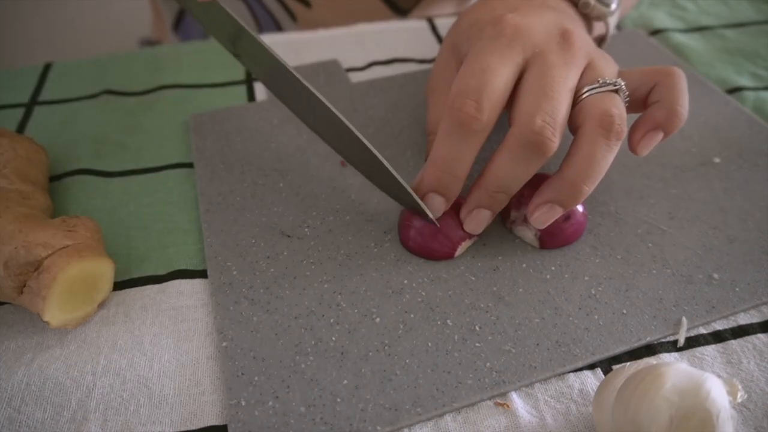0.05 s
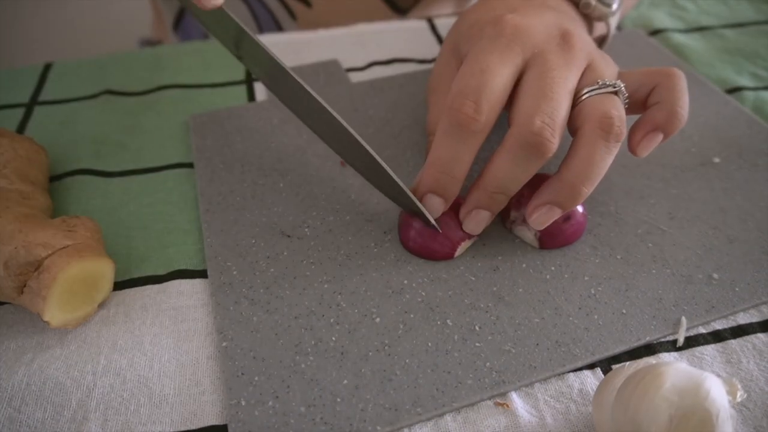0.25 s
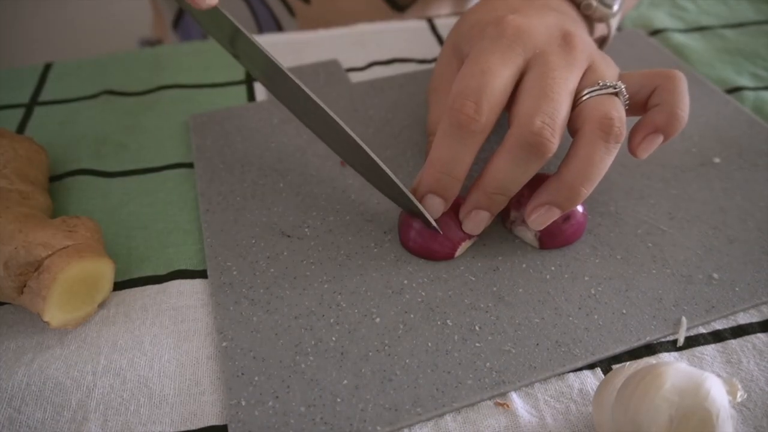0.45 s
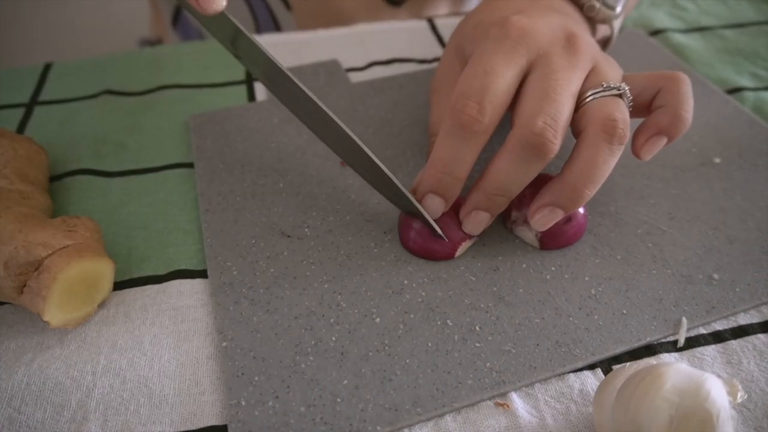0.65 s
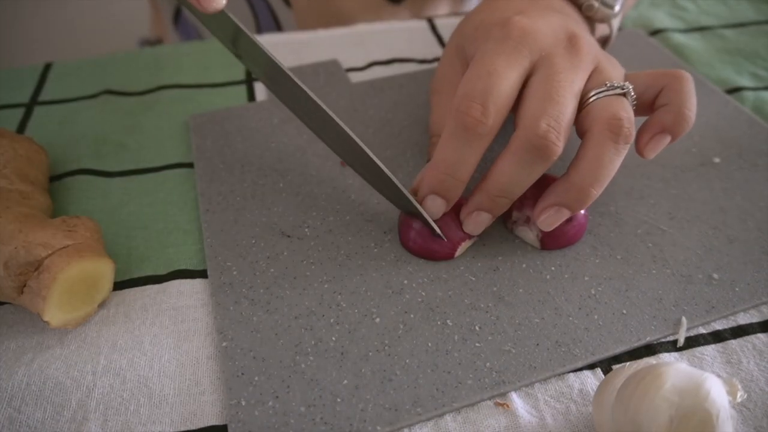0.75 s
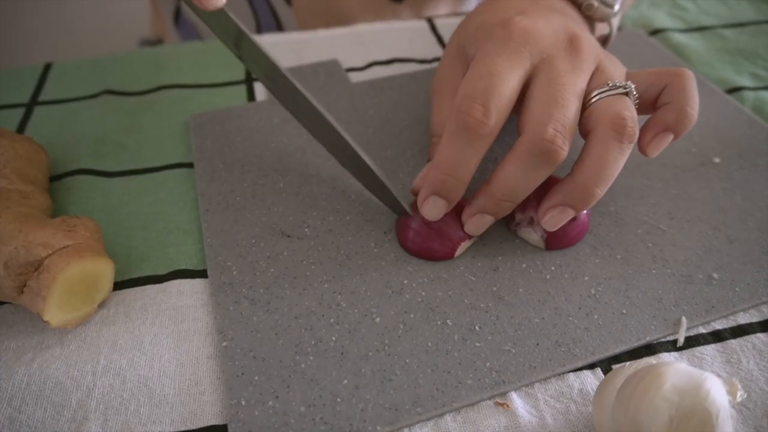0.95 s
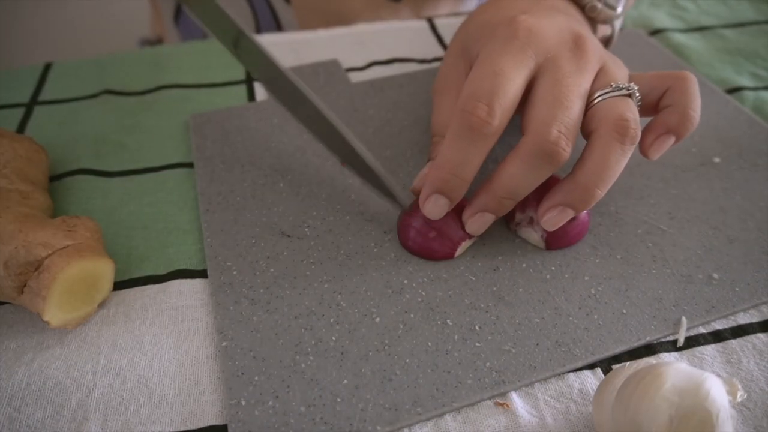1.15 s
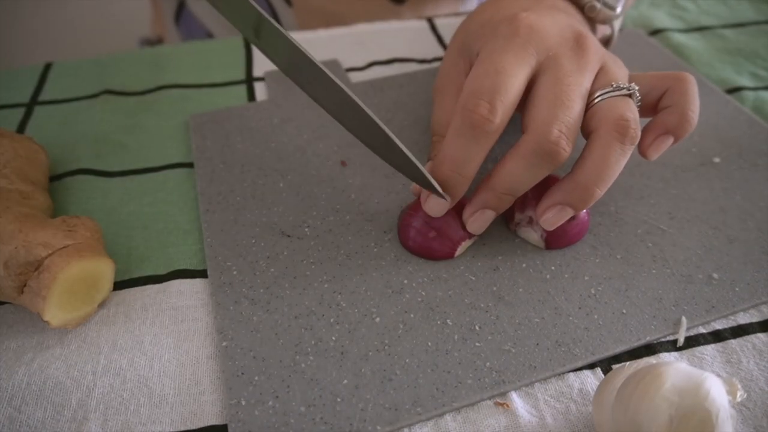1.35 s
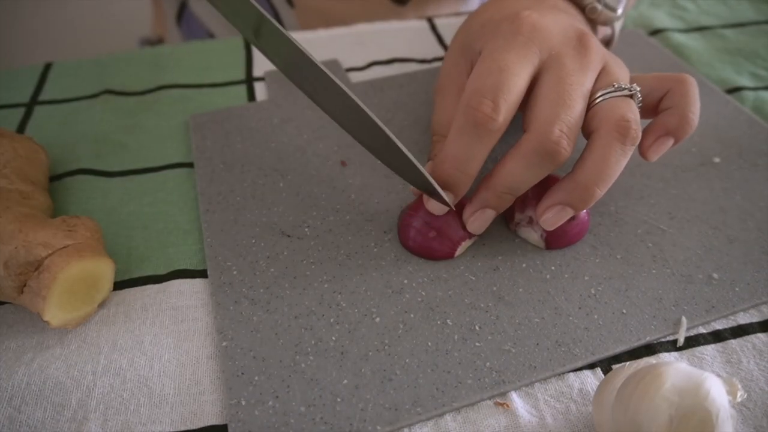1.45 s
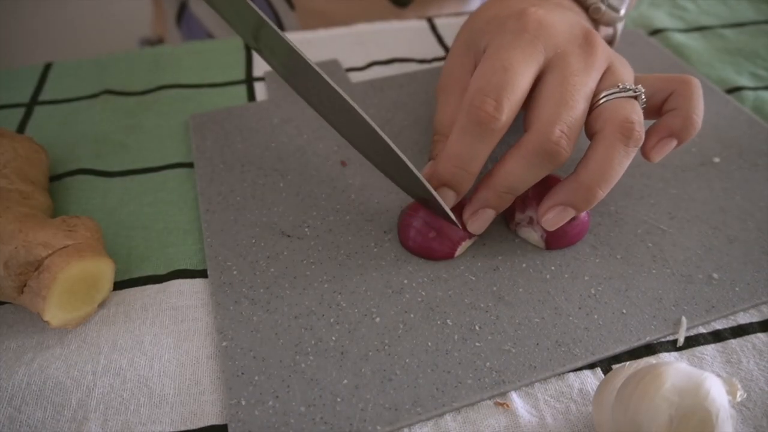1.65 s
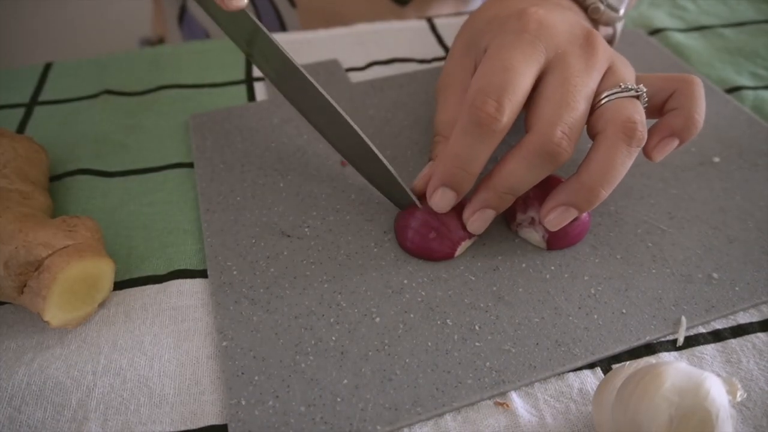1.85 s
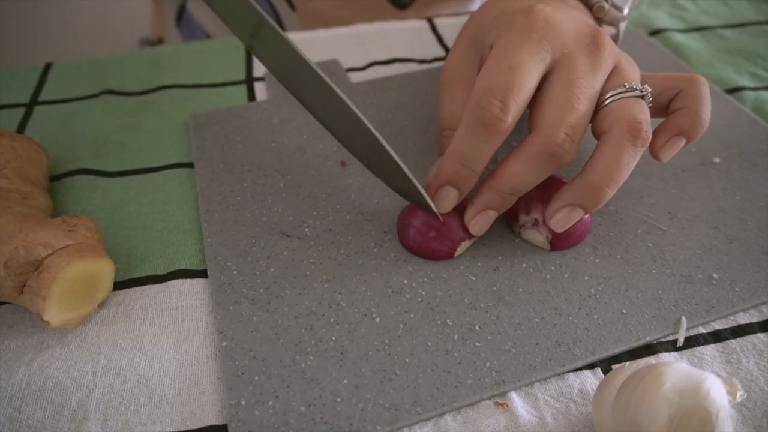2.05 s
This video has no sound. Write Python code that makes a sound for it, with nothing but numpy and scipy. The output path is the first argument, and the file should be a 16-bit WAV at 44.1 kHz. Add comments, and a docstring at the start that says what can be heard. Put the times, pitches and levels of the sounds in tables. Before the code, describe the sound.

Close cutting of a shallot in a quiet kitchen: the knife crackles softly through the layers and knocks sharply on a plastic board. It pauses, then crunches through again and strikes the board once more.

```python
"""Cutting a shallot

A knife tip pierces a shallot on a plastic board in a quiet kitchen. Tearing cells crackle, single layers
snap and soft landings thud. Two hard chops excite the modes of the board, the worktop and a metal bowl
nearby. The room reverberates, and the microphone overloads on the chops."""
import sys
import numpy as np
from scipy import signal
from scipy.io import wavfile

SR = 44100
rng = np.random.default_rng(int(sys.argv[2]) if len(sys.argv) > 2 else 0)


def put_to_file(sound):
    """Save the sound as 16-bit audio at rate SR, in the file named by the first command-line argument."""
    columns = np.atleast_2d(sound).T  # one column per channel
    safe = np.clip(columns, -1, 1)
    whole_steps = np.round(safe * 32767)
    wavfile.write(sys.argv[1], SR, whole_steps.astype(np.int16))


N = 92698


def amp(db):
    return 10 ** (np.asarray(db) / 20)


def unit_rms(x):
    return x / np.sqrt(np.mean(x ** 2) + 1e-20)


def at_hz(curve, hz):
    freqs, values = np.transpose(curve)
    return np.interp(np.log(hz), np.log(freqs), values)


def band(x, low_hz, high_hz):
    return signal.sosfilt(signal.butter(2, [low_hz, high_hz], "band", fs=SR, output="sos"), x)


def filter_bank(x, spectrum):
    """Spectral shaping: parallel third-octave bands, each at its own level."""
    low_hz, high_hz = spectrum[0][0], spectrum[-1][0]
    edges = low_hz * 2 ** np.arange(0, np.log2(high_hz / low_hz) + .1, 1 / 3)
    return sum(amp(at_hz(spectrum, np.sqrt(a * b))) * (-1) ** k * band(x, a, b)
               for k, (a, b) in enumerate(zip(edges, edges[1:])))


def drift(rate_hz):
    """Random modulation: low-passed noise of unit RMS."""
    r = np.exp(-2 * np.pi * rate_hz / SR)
    return unit_rms(signal.lfilter([1], [1, -2 * r, r * r], rng.standard_normal(N + SR))[SR:])


def mode(x, hz, t60_s):
    """Damped resonance: each impulse starts a decaying sine."""
    r, w = amp(-60 / (t60_s * SR)), 2 * np.pi * hz / SR
    return signal.lfilter([0, np.sin(w)], [1, -2 * r * np.cos(w), r * r], x + 1e-18)


def impulses(times_s, levels_db):
    out = np.zeros(N)
    np.add.at(out, (np.asarray(times_s) * SR).astype(int), amp(levels_db))
    return out


def noise_burst(x, t60_s):
    """Exponential decay: each impulse starts a dying burst of white noise."""
    envelope = signal.lfilter([1], [1, -amp(-60 / (t60_s * SR))], x + 1e-18)
    return envelope * rng.standard_normal(N)


def relax(x, tau_s):
    """Relaxation: each impulse becomes a decaying pulse of the same height."""
    return signal.lfilter([1], [1, -np.exp(-1 / (tau_s * SR))], x + 1e-18)


def contact_force(start_s, level_db, contact_ms):
    """Elastic impact: a half-sine force, duller the longer the contact lasts."""
    pulse = np.sin(np.linspace(0, np.pi, int(contact_ms * SR / 1000) + 2))
    return np.convolve(impulses([start_s], level_db), pulse / pulse.sum())[:N]


# Background spectrum: frequency_hz, relative_density_db
AIR_SPECTRUM = [(12, -42), (20, 1), (127, -5), (248, -6.5), (434, -8.5), (513, -10), (1030, -16),
                (3160, -30), (3840, -33.5), (4670, -34), (5380, -39), (14700, -50), (16000, -55)]


def kitchen_air():
    """Noise floor: bass-heavy air and microphone hiss, wavering slowly in level."""
    noise = filter_bank(rng.standard_normal(N + SR // 2), AIR_SPECTRUM)[SR // 2:]
    return amp(-42.5 + 1.36 * drift(rate_hz=2.1)) * unit_rms(noise)


# Reverberation time: frequency_hz, t60_s
ROOM_DECAY = [(100, 0.54), (260, 0.43), (700, 0.39), (1840, 0.49), (4200, 0.52), (6500, 0.42),
              (12000, 0.33)]
# Reverberation spectrum: frequency_hz, relative_level_db
ROOM_SPECTRUM = [(60, -9.5), (200, -1), (500, -4), (1000, -3), (2000, -6.5), (3000, -12), (4200, -12),
                 (6000, -17), (9000, -10.5), (15000, -17)]


def room(x, gain_db=-32.5, rise_s=0.0094):
    """Diffuse reverberation: a noise response builds up, then decays band by band."""
    t = np.arange(SR // 2) / SR
    edges = 50 * 2 ** np.arange(0, 8.6, .5)
    white = rng.standard_normal((2, len(t)))
    tail = 0
    for k, (a, b) in enumerate(zip(edges, edges[1:])):
        hz = np.sqrt(a * b)
        tail += band(white[k % 2], a, b) * amp(at_hz(ROOM_SPECTRUM, hz) - 60 * t / at_hz(ROOM_DECAY, hz))
    build_up = 1 - np.exp(-(t / rise_s) ** 2)
    return amp(gain_db) * signal.fftconvolve(x, tail * build_up)[:N]


# Soft landings of blade or shallot: start_s, level_db, contact_ms
LANDINGS = [(0.0492, -11, 3.4), (0.0702, -19, 4.8), (0.26, -28, 0.89), (.51, -22.5, 1.25),
            (0.802, -29.5, 2.3), (0.886, -29, 1.3), (1.582, -13.5, 2.7), (1.593, -19, 2.5),
            (1.718, -9.5, 1.7), (1.739, -14, 1.2), (1.991, -40, 2.6)]
# Low modes of board and worktop: pitch_hz, gain_db, t60_s
LOW_MODES = [(105, -12, .08), (170, 0.5, .025), (235, -8, .04)]


def thuds():
    """Low-pass excitation: soft contacts stir only the lowest modes of board and worktop."""
    force = band(sum(contact_force(*row) for row in LANDINGS), 76, 3000)
    return sum(amp(db) * mode(force, hz, t60) for hz, db, t60 in LOW_MODES)


# Cutting envelopes, one per stroke: time_s, crackle_db, crunch_relative_db
CUTTING_STROKES = [
    [(0.05, -48, 6), (0.066, -58.5, 1), (0.096, -49.5, 2.5), (0.154, -67, 4), (0.174, -57.5, 1),
     (0.244, -50, 5), (0.26, -40.5, 7.5), (0.282, -72, 3), (0.328, -63, 4), (0.336, -81, 15),
     (0.344, -64, 11), (0.36, -76, 11)],
    [(.44, -70, 4), (.4894, -58, 10), (.4925, -40, 15.5), (.5035, -47.5, 9.5), (.5085, -42.5, 13.5),
     (.5305, -48.5, 9.5), (.5555, -45.5, 4), (.5785, -54, -2), (.6, -67, -2), (.63, -60, 8), (.668, -69, 3),
     (.7, -62, -3)],
    [(.7, -82, -2), (.74, -56, 15), (.76, -64, 9), (.8, -50.5, 8), (.83, -63.5, 8), (.87, -63.5, 7),
     (.882, -50, 12), (.91, -66, -3), (.946, -56.5, 8.5), (.957, -44.5, 8), (.967, -37, 8),
     (.9785, -22.5, 9), (.9805, -41, -5)],
    [(1.583, -45.5, 8), (1.6, -70.5, -9), (1.63, -79, -3), (1.636, -56.5, 7.5), (1.66, -69, -5),
     (1.675, -49, 9.5), (1.688, -59, 4), (1.695, -37.5, 5), (1.706, -46, 15), (1.711, -31.5, 10.5),
     (1.719, -31, 4), (1.723, -51, -15), (1.735, -66, -1)],
    [(1.7664, -29, 15), (1.7725, -51, 3), (1.7785, -43, 5), (1.7825, -30.5, 9), (1.7965, -27, 5),
     (1.8105, -25.5, 4.5), (1.8195, -29.5, 14.5), (1.8225, -55, -3)],
    [(1.88, -61, 13), (1.91, -59, 9), (1.95, -46, -19), (1.96, -70, 3), (1.992, -58.5, -16),
     (2.01, -72, -15), (2.05, -81, 3)],
]
# Spectra of fine crackle and coarse crunch: frequency_hz, relative_density_db
CRACKLE_SPECTRUM = [(3000, -30), (3900, -8), (4800, 5.5), (6000, -0.5), (7400, -16.5), (9200, 7),
                    (11000, -10), (13200, -5.5), (15600, -6)]
CRUNCH_SPECTRUM = [(250, -2), (600, 3), (900, -0.5), (1300, -3.5), (2000, -1.5), (2600, -1.5), (3300, -9),
                   (4200, -27)]


def tearing_cells(tears_per_s=7000, spread_db=4.0, clump_db=2.6):
    """Acoustic emission: cells tear in dense, clumped clicks, heard as crackle and crunch."""
    t, fine, coarse = np.arange(N) / SR, np.zeros(N), np.zeros(N)
    for stroke in CUTTING_STROKES:
        time_s, crackle_db, relative_db = np.transpose(stroke)
        fine += amp(np.interp(t, time_s, crackle_db, -200, -200))
        coarse += amp(np.interp(t, time_s, crackle_db + relative_db, -200, -200))
    sizes = amp(spread_db * np.minimum(rng.exponential(1, N), 4)) * rng.choice([-1, 1], N)
    tears = sizes * (rng.random(N) < tears_per_s / SR) * amp(clump_db * drift(rate_hz=146))
    crackle = fine * unit_rms(filter_bank(tears, CRACKLE_SPECTRUM))
    crunch = coarse * unit_rms(filter_bank(tears, CRUNCH_SPECTRUM))
    # Dry skin rustles on top, partly following the crackle's level.
    skin = amp(-23) * fine ** .6 * unit_rms(band(tears[::-1], 9000, 16600))
    return skin + crackle + crunch


# Single layers breaking: start_s, level_db, pop_relative_db
LAYER_SNAPS = [(.0505, -29, -7), (0.2538, -39, -8), (0.2624, -27, 3.5), (0.4913, -21.5, 4),
               (.492, -20, 5.5), (.5048, -26.5, -2), (.5066, -17.5, -4.5), (.5735, -20, -9),
               (.589, -32, -15), (.6188, -33, -8), (.711, -38, -25), (0.726, -38, -9), (0.7372, -24, -8),
               (.779, -23, -15), (.852, -37, -6), (.876, -33.5, 4), (0.9138, -30.5, -5), (0.9377, -35, 2),
               (0.9738, -14, 3), (1.11, -27, -23), (1.131, -27, -25), (1.175, -32, -23), (1.21, -45, -42),
               (1.585, -31, 3.5), (1.6333, -34, -6), (1.6753, -26, -2), (1.6945, -31, -7),
               (1.766, -15.5, 2), (1.782, -22, -6), (1.7962, 0, -9), (1.808, -7, 2)]


def snapping_layers():
    """Sudden fracture: each layer gives a bright tick, a duller inward pop and a short fizz."""
    start_s, level_db, pop_db = np.transpose(LAYER_SNAPS)
    breaks = impulses(start_s, level_db)
    tick = relax(breaks, tau_s=3e-5)
    pop = relax(impulses(start_s, level_db + pop_db - 1.5), tau_s=1e-4)
    pop = relax(pop, tau_s=1e-4)  # rounds the attack
    fizz = amp(-13) * band(noise_burst(breaks, t60_s=0.004), 1200, 14000)
    return fizz - band(tick + pop, 620, 22000)


# Touches of the knife tip: start_s, level_db, buzz_relative_db
TIP_TOUCHES = [(.0515, -38.5, -9), (1.583, -38, -31.5)]
# Blade modes: pitch_hz, gain_db, t60_s
BLADE_MODES = [(9400, -9, .05), (13200, -22, .02), (14900, -20, .02)]


def singing_blade():
    """Modal ringing: a touch makes the blade sing, and sparse fading clicks keep it buzzing."""
    start_s, level_db, buzz_db = np.transpose(TIP_TOUCHES)
    taps = impulses(start_s, level_db)
    buzz = amp(1.5) * noise_burst(impulses(start_s, level_db + buzz_db), t60_s=0.46)
    buzz *= rng.random(N) < .01
    return sum(amp(db) * mode(taps + buzz, hz, t60) for hz, db, t60 in BLADE_MODES)


# Hard chops: start_s, level_db, contact_ms, bowl_db, room_treble_db
HARD_CHOPS = [(0.9792, 8, 0.51, -30.5, 20), (1.8199, 5.5, 0.69, -36.5, 3)]
# Plastic board modes: pitch_hz, gain_db, t60_s
BOARD_MODES = [(187, -25.5, 0.2), (229, -19, 0.16), (310, -40, 0.46), (412, -15.5, 0.19), (505, -24, 0.23),
               (512, -21.5, 0.18), (676, -29, 0.098), (738, -25.5, 0.29), (797, -21, 0.25),
               (802, -27, 0.34), (918, -26, 0.23), (1007, -36, 0.37), (1230, -38, 0.49),
               (1427, -29.5, 0.25)]


def chops(board_rise_s=0.01):
    """Impact radiation: an N-shaped pulse and a crack, then the modes of worktop and board."""
    impact, ringing = np.zeros(N), np.zeros(N)
    for start_s, level_db, contact_ms, _, _ in HARD_CHOPS:
        force = contact_force(start_s, level_db, contact_ms)
        pulse = 2 * mode(force, hz=480 / contact_ms, t60_s=0.0059 * contact_ms)
        crack = band(noise_burst(impulses([start_s], level_db), t60_s=0.0032), 2100, 9100)
        impact += pulse + amp(-8.5) * crack
        worktop = amp(-36.5) * mode(force, hz=55.5, t60_s=0.32)
        board = sum(amp(db) * (-1) ** k * mode(force, hz, t60)
                    for k, (hz, db, t60) in enumerate(BOARD_MODES))
        age_s = np.maximum(np.arange(N) / SR - start_s, 0)
        ringing += worktop + board * (1 - np.exp(-age_s / board_rise_s))
    return impact, ringing


def metal_bowl(initial_db=-46.5):
    """Sympathetic vibration: each chop excites a lightly damped mode, already ringing faintly."""
    start_s, _, _, bowl_db, _ = np.transpose(HARD_CHOPS)
    drive = impulses([0], initial_db) + impulses(start_s, bowl_db)
    return mode(drive, hz=430.2, t60_s=4.76)


def scene():
    """Superposition: direct sound, reverberation and background, alike in both channels."""
    impact, ringing = chops()
    cutting = tearing_cells() + snapping_layers() + singing_blade() + thuds()
    chop_s, *_, treble_db = np.transpose(HARD_CHOPS)
    chops_to_room = band(impulses(chop_s, treble_db), 1720, 4700) + band(impact, 32, 3200)
    reverberation = room(amp(-2) * cutting + chops_to_room)
    mono = cutting + impact + ringing + metal_bowl() + reverberation + kitchen_air()
    return np.array([mono, mono])


def record(dry, ceiling=.9, stopband_hz=16377):
    """Saturation: the microphone overloads on the chops; a steep low-pass cuts the top."""
    clipped = ceiling * np.tanh((dry / ceiling) ** 2) ** .5 * np.sign(dry)
    return signal.sosfilt(signal.cheby2(14, 60, stopband_hz, fs=SR, output="sos"), clipped)


dry = scene()
out = record(dry)
put_to_file(out)
```